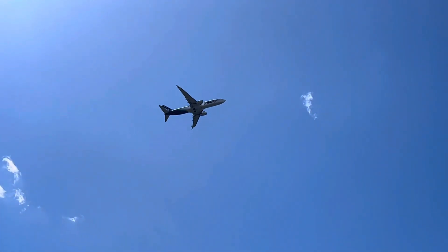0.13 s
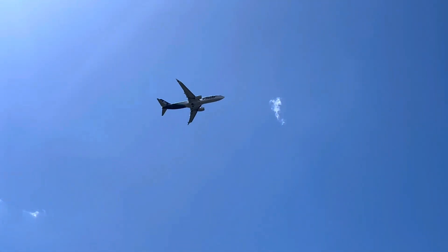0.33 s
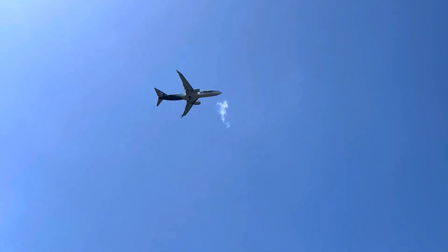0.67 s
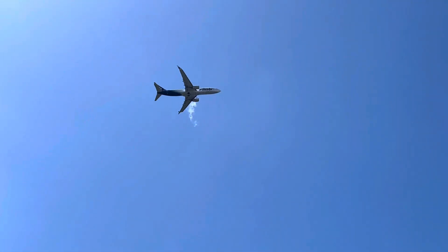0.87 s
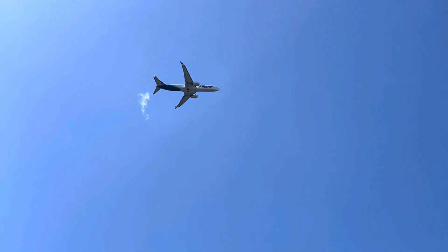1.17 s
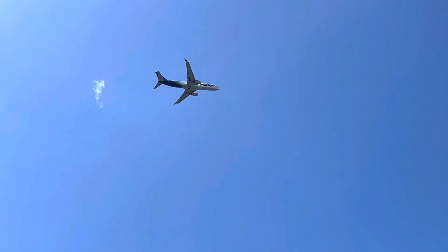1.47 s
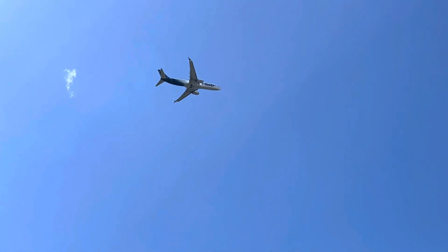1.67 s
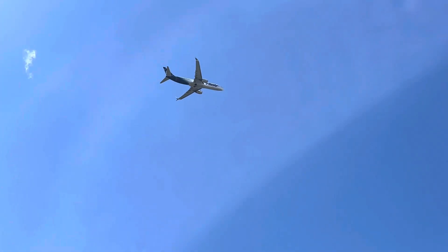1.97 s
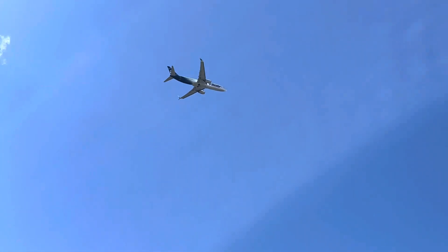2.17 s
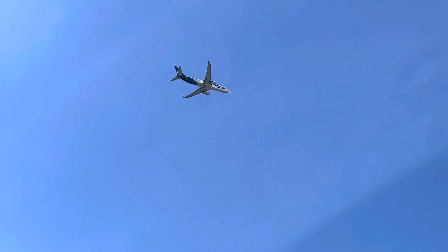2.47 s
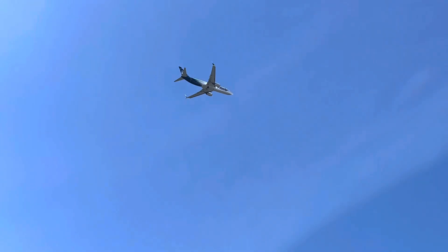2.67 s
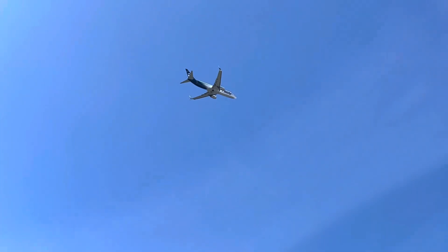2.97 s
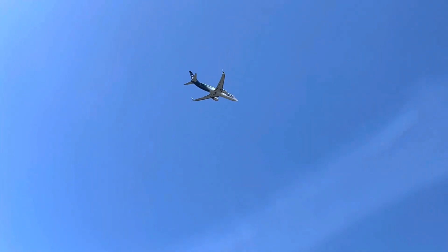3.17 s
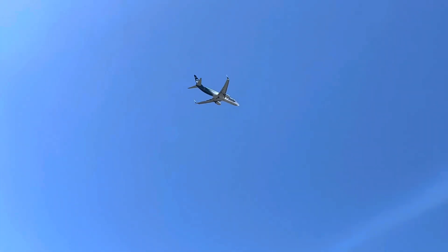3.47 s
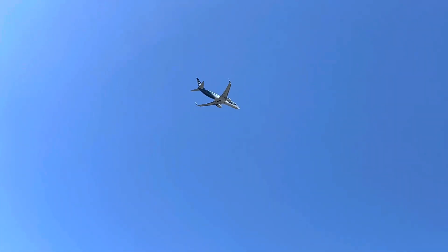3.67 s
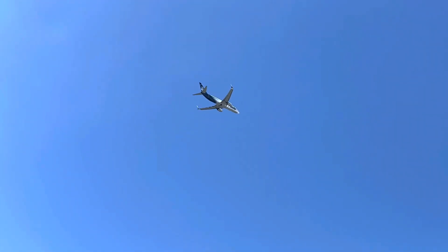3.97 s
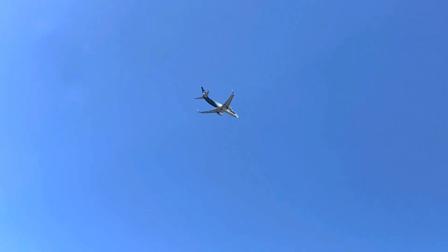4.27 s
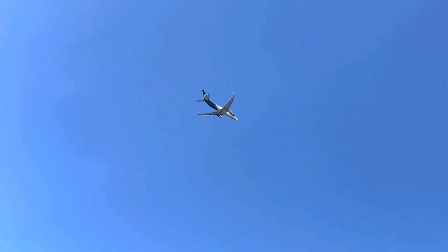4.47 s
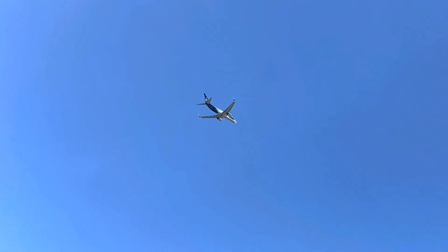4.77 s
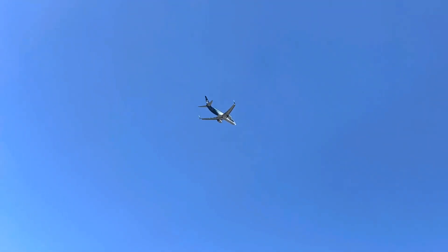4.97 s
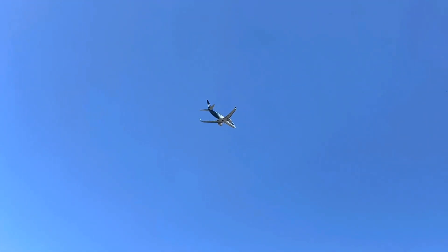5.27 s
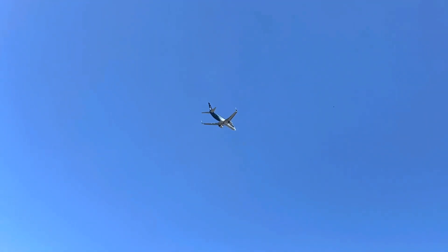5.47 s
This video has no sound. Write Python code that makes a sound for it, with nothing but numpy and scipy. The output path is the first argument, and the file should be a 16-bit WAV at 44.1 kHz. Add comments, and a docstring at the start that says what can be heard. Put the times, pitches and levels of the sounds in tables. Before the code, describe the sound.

Outdoors under a clear sky, one departing passenger jet dominates. Continuous deep rumble and rushing midrange noise start at full strength, with ragged crackling flutter in the treble. A weak whine hides inside the roar, falling gradually as the plane flies off. The level eases only slightly by the end. Captured on a small device with two tiny microphones, uneven stereo and muted highs.

```python
"""A broad exhaust roar fills the sky at once: a jet airliner climbing away overhead, over open ground.
Shaped noise makes the roar; turbulent air swells and sags it, more raggedly in the treble.
A faint fan whine of three blurred harmonics falls in pitch as the plane recedes, and a dull, late
copy off the ground combs the bass. Two small microphone ports give the stereo image, each with its
own level, phase and scattered sound; a very faint bass image sits about a high carrier."""
import sys
import numpy as np
from scipy import signal
from scipy.fft import rfft, irfft, next_fast_len
from scipy.io import wavfile

SR = 44100
rng = np.random.default_rng(int(sys.argv[2]) if len(sys.argv) > 2 else 0)


def to_wav(s):
    """Save 16-bit WAV."""
    ch = np.atleast_2d(s).T  # columns
    pcm = np.round(np.clip(ch, -1, 1) * 32767)  # PCM
    wavfile.write(sys.argv[1], SR, pcm.astype(np.int16))


def volts_from_decibels(level):
    """Turn decibel levels (scalar or array-like) into linear amplitude factors."""
    exponent = np.asarray(level, float) / 20
    return 10 ** exponent


N = 247401  # length [samples]

# Exhaust colour before the moving levels: (frequency [Hz], relative level per Hz [dB])
EXHAUST_SPECTRUM = [(15, -49), (32, -22), (58, 0.5), (100, -1), (125, -.5), (155, 0.5), (200, -5),
                    (310, -6), (560, -11.5), (800, -15.5), (1020, -20.5), (1300, -18), (1450, -19),
                    (1600, -21.5), (1780, -21.5), (2100, -26.5), (2500, -29.5), (3300, -34), (4100, -42.5),
                    (5100, -50), (6300, -60.5), (7500, -77.5)]
# Swell of the upper roar as eddies focus and scatter it: (time [s], relative level [dB])
UPPER_SWELL = [(0, 10.5), (.1, 3), (.2, 6.5), (.34, -2.5), (.53, 1.5), (.67, -5), (.86, 2.5), (.96, 5),
               (1.12, 5), (1.22, -0.5), (1.29, 5), (1.36, 0.5), (1.48, 5), (1.58, 1), (1.88, 3),
               (2.02, -2.5), (2.15, 4), (2.31, 5.5), (2.39, 4.5), (2.47, 4.5), (2.66, -2), (2.81, -4.5),
               (2.91, 1.5), (3.0, -4.5), (3.25, 3), (3.39, -3.5), (3.51, 1), (3.69, -5), (3.86, 6),
               (4.0, -4.5), (4.12, 5.5), (4.22, -4.5), (4.3, -4.5), (4.44, -4), (4.59, 4), (4.7, -4),
               (4.9, 6.5), (5.03, -2.5), (5.19, -0.3), (5.3, -2), (5.48, -10), (5.61, -1)]
# Treble of the roar: (time [s], relative level [dB])
TREBLE_LEVEL = [(0.0, -38.5), (0.12, -41), (0.14, -34), (0.23, -38), (0.3, -44.5), (0.55, -37.5),
                (0.64, -45.5), (0.83, -35), (0.84, -31), (0.94, -40.5), (1.11, -34), (1.23, -38.5),
                (1.31, -35.5), (1.34, -41.5), (1.5, -38), (1.64, -45), (1.67, -38), (1.78, -43.5),
                (1.87, -37.5), (2.02, -44.5), (2.16, -39), (2.22, -40.5), (2.34, -32.5), (2.4, -39),
                (2.48, -33.5), (2.53, -42.5), (2.86, -46.5), (2.89, -41), (3.44, -41.5), (3.47, -39),
                (3.69, -46.5), (3.77, -41.5), (3.86, -33), (3.94, -41), (4.03, -44.5), (4.11, -35.5),
                (4.23, -46.5), (4.58, -39.5), (4.69, -45.5), (4.91, -34.5), (5.0, -44.5), (5.06, -38.5),
                (5.52, -48.5), (5.61, -39.5)]
# Low roar: (time [s], relative level [dB])
LOW_ROAR_LEVEL = [(0.0, -23), (0.25, -24), (0.45, -21), (0.7, -24.5), (1.03, -17.5), (1.2, -21),
                  (1.79, -25.5), (2.11, -22), (2.44, -18), (2.67, -27.5), (3.05, -20), (3.35, -25),
                  (3.56, -23), (4.36, -26.5), (4.69, -24), (4.97, -17.5), (5.18, -24.5), (5.6, -29.5)]
# Rumble under the roar: (time [s], relative level [dB])
RUMBLE_LEVEL = [(0.0, -22), (0.64, -20.5), (1.53, -22.5), (2.4, -22), (3.39, -23.5), (4.26, -22),
                (4.63, -23.5), (5.6, -22.5)]
# Topmost hiss: (time [s], relative level [dB])
HISS_LEVEL = [(0.0, -51.5), (0.09, -57.5), (0.19, -53.5), (0.31, -60.5), (0.47, -52), (0.72, -60),
              (0.86, -49.5), (0.9, -54), (1.56, -57.5), (2.06, -54), (2.09, -48.5), (2.11, -55),
              (2.17, -51.5), (2.45, -53.5), (2.76, -61), (2.92, -53), (2.98, -58), (3.05, -53),
              (3.14, -62.5), (3.19, -56.5), (3.34, -58), (3.51, -52.5), (3.66, -61), (3.81, -58),
              (3.88, -49), (3.92, -58), (3.97, -59.5), (4.12, -52), (4.16, -58.5), (4.23, -63.5),
              (4.47, -60), (4.5, -54.5), (4.67, -60), (4.87, -54), (5.52, -66.5), (5.61, -56.5)]
# How each pitch of the roar moves: (frequency [Hz], share of swell [ratio], share of low roar [ratio],
# share of rumble [ratio], share of eddy flicker [ratio], gain seen from astern [dB],
# share of treble [ratio], share of topmost hiss [ratio])
BAND_FOLLOW = [(45, 0.01, 0.01, 1.8, 0.01, -4, 0, 0), (90, 0.01, 0.01, 1.8, 0.01, 1, 0.076, 0),
               (179, 0.054, 0.085, 0.65, .05, 0.5, 0, 0), (258, 0.046, 0.71, 0.23, 0.18, 2, 0.18, 0),
               (387, 0.032, .9, .05, 0.17, -1, 0, 0.017), (724, 0.52, 0.7, 0.01, 0.68, -0.8, 0, 0.23),
               (1030, 0.82, 0.22, .01, 0.37, -2, 0, 0), (1440, 1.0, .05, 0.01, 0.96, 0.5, 0, 0),
               (1900, 0.71, .01, 0.01, .8, 1, 0.83, 0.19), (2050, 0.37, .01, .01, 0.73, -3, 0.62, 0),
               (2900, 0.046, .01, 0.01, 0.48, 1.5, 0.94, 0.15), (4100, .05, .01, .01, 0.3, -1, 0.45, .55),
               (5800, .05, .01, 0.01, 0.3, 0.3, 0.15, 0.8)]
# Blade rate as heard, falling as the plane recedes: (time [s], frequency [Hz])
BLADE_RATE = [(0, 1975), (.15, 1960), (1.1, 1880), (1.65, 1813), (2.2, 1748), (2.6, 1724), (3.0, 1686),
              (3.45, 1648), (4.1, 1617), (4.55, 1592), (4.85, 1571), (5.3, 1568), (5.61, 1561)]
# Fan whine before waver and swell, overtones beamed rearward:
# (time [s], 1st harmonic [dB], 2nd harmonic [dB], 3rd harmonic [dB])
FAN_LEVELS = [(0, -50, -66, -84), (.15, -40, -67, -84), (.35, -48, -68, -84), (1.1, -41, -66, -82),
              (1.45, -44, -66, -80), (1.65, -39, -55, -78), (2.0, -41, -58, -76), (2.2, -41, -52, -74),
              (2.7, -47, -60, -76), (2.95, -47, -54, -74), (3.3, -47, -57, -72), (3.5, -47, -51, -70),
              (3.65, -50, -62, -72), (4.35, -50, -59, -70), (4.5, -50, -50, -62), (4.68, -50, -58, -65),
              (4.85, -50, -48, -63), (5.2, -47, -49.5, -63), (5.4, -46, -51, -73), (5.5, -48, -50.5, -68),
              (5.61, -48, -50, -58)]
# Extra path by way of the ground, longest under the plane: (time [s], lag [ms])
GROUND_DELAY = [(0, 6.05), (.8, 6.4), (2.0, 7.15), (2.8, 7.3), (3.5, 7.1), (4.3, 6.65), (5.61, 6.4)]
# The two ports: (frequency [Hz], left over right [dB], left lead [rad], share common to both [0-1])
PORT_BALANCE = [(30, 0.1, 0.01, .97), (150, -1.2, .1, .96), (480, 0.1, .25, .85), (700, -1.5, .95, .85),
                (900, 4.1, 1.2, .75), (1010, 3.5, .8, .3), (1060, 1.1, .1, .5), (1200, -2, .5, .65),
                (1300, -3.5, .9, .7), (1400, -5, 1.45, .75), (1500, -6.5, 2.1, .8), (1590, -7, 2.5, .8),
                (1645, -7, 2.5, .8), (1670, -8, -.15, .86), (1800, -8, -.1, .88), (2050, -5.5, .01, .9),
                (2500, -2.5, .24, .95), (3000, -1, .28, .95), (3400, -.3, .2, .96), (3900, 0, .03, .997),
                (4800, 0, 0, 1), (5150, 0, 0, 1), (5220, 0, -.4, .97), (5750, 0, -1.05, .9),
                (6300, 0, -.9, .86), (7400, 0, -1.5, .6)]
# Balance added as the direction swings: (frequency [Hz], left over right [dB], left lead [rad])
BALANCE_SHIFT = [(600, 0, 0), (900, -3, .2), (1000, -4, .9), (1100, -.5, .4), (1300, .1, .45),
                 (1500, -1.8, .05), (1640, -1.5, -.15), (1800, -2.5, -.1), (2600, 0, 0)]
# How much of that shift applies: (time [s], amount [-1 to 1])
DIRECTION_SWING = [(0, -0.42), (1.05, 0.019), (1.75, 0.95), (2.45, 0.92), (3.15, 0.15), (3.85, -0.28),
                   (4.5, -1), (5.61, -0.49)]


def exhaust(shared_db, own_db):
    """Three unrelated jet-noise roars with the same swells: one common to both ports, one scattered to each."""
    roar_db = -17  # overall rms level
    eddy_hz, rasp_hz, own_hz = 14, 90, 13.2  # corner rates of the flickers
    rasp_db, rasp_follows_swell = 1.3, 0.6  # ragged flicker at mid-swell, deeper in the swells
    size = next_fast_len(N)
    hz = np.arange(size // 2 + 1) * SR / size
    colour_db, = at_hz(EXHAUST_SPECTRUM, hz)
    noise = rfft(rng.standard_normal((3, size))) * volts_from_decibels(colour_db)

    swell_db = swing(UPPER_SWELL)
    eddies = shared_db * drift(eddy_hz)
    rasp = rasp_db * volts_from_decibels(rasp_follows_swell * swell_db) * drift(rasp_hz)
    # same order as the columns of BAND_FOLLOW
    controls = np.array([swell_db, swing(LOW_ROAR_LEVEL), swing(RUMBLE_LEVEL), eddies + rasp,
                         astern(), swing(TREBLE_LEVEL), swing(HISS_LEVEL)])

    roars = np.zeros((3, N))
    for centre_hz in 32 * 2 ** np.arange(0, 8.6, 0.5):
        octaves = np.log2((hz + 1e-9) / centre_hz)
        # bands half an octave apart, overlapping so that they sum to one
        band = np.where(abs(octaves) < 0.5, np.cos(np.pi * octaves) ** 2, 0)
        shares = np.array(at_hz(BAND_FOLLOW, centre_hz))
        level_db = shares @ controls + own_db * drift(own_hz)
        roars += volts_from_decibels(level_db) * irfft(noise * band, size)[:, :N]
    return volts_from_decibels(roar_db) * rms_one(roars)


def astern():
    """Share of the plane's speed that points away from the listener on a straight pass, -1 to 1."""
    speed_m_per_s, closest_m, closest_s = 90, 400, 1.5
    along_m = speed_m_per_s * (np.arange(N) / SR - closest_s)
    return along_m / np.hypot(along_m, closest_m)


def fan(waver_db):
    """Three harmonics of the blade rate: a steady core plus a share blurred into a narrow noise band."""
    blur_hz, blurred_share = (20, 12, 45), (0.65, 0.3, 0.9)  # for each harmonic
    waver_hz, follows_swell = 5.0, 0.25
    blade_hz, = in_time(BLADE_RATE)
    phase = 2 * np.pi * np.cumsum(blade_hz) / SR
    whine = np.zeros(N)
    for k, level_db in enumerate(in_time(FAN_LEVELS)):
        # turbulence scrambles level and phase
        blur = drift(blur_hz[k]) + 1j * drift(blur_hz[k])
        steady = np.sqrt(2 * (1 - blurred_share[k]))
        carrier = steady + np.sqrt(blurred_share[k]) * blur
        tone = np.real(carrier * np.exp(1j * (k + 1) * phase))
        whine += volts_from_decibels(level_db + waver_db * drift(waver_hz)) * tone
    return volts_from_decibels(follows_swell * swing(UPPER_SWELL)) * whine


def ground(direct):
    """The ground's longer path gives a later copy, dulled by a one-pole lowpass."""
    echo_db, cut_hz = -7.5, 1530
    lag_ms, = in_time(GROUND_DELAY)
    samples = np.arange(N)
    late = np.interp(samples - lag_ms * SR / 1000, samples, direct)
    keep = np.exp(-2 * np.pi * cut_hz / SR)
    return volts_from_decibels(echo_db) * signal.lfilter([1 - keep], [1, -keep], late)


def ports(common, scattered, shift):
    """Each port hears the common wave with its own level and phase, plus its own scattered share."""
    dip_hz, dip_shift_hz, dip_width_hz, dip_db = 1640, 20, 35, -1.5
    top_hz = 7600  # nothing passes above
    size = next_fast_len(N + 4096)
    hz = np.arange(size // 2 + 1) * SR / size
    over_db, lead, share = at_hz(PORT_BALANCE, hz)
    added_db, added_lead = at_hz(BALANCE_SHIFT, hz)
    over_db = over_db + shift * added_db
    lead = lead + shift * added_lead
    share = np.clip(share, 0, 1)

    side = np.array([[0.5], [-0.5]])  # left, right
    shared_wave = np.sqrt(share) * rfft(common, size) * np.exp(1j * side * lead)
    own_wave = np.sqrt(1 - share) * rfft(scattered, size)
    # a narrow dip on the right where the phase jumps
    offset = (hz - dip_hz - dip_shift_hz * shift) / dip_width_hz
    right_db = dip_db * np.exp(-offset ** 2)
    gain = volts_from_decibels(side * over_db + [[0], [1]] * right_db)
    return irfft((shared_wave + own_wave) * gain * (hz < top_hz), size)[:, :N]


def bass_image(dry):
    """Multiplying the bass by a high carrier mirrors it faintly above and below the carrier."""
    image_db, bass_cut_hz, carrier_hz = -68, 370, 9600
    lowpass = signal.butter(6, bass_cut_hz, fs=SR, output="sos")
    bass = signal.sosfilt(lowpass, dry.mean(axis=0))
    return volts_from_decibels(image_db) * bass * 2 * np.cos(2 * np.pi * carrier_hz * np.arange(N) / SR)


def rms_one(x):
    """Scale to unit rms."""
    return x / np.sqrt(np.mean(x ** 2) + 1e-20)


def in_time(rows):
    """Each column as a straight-line curve per sample."""
    s, *columns = np.transpose(rows)
    return [np.interp(np.arange(N) / SR, s, c) for c in columns]


def at_hz(points, hz):
    """Each column read on a log-frequency axis."""
    f, *columns = np.transpose(points)
    return [np.interp(np.log(hz + 1e-9), np.log(f), c) for c in columns]


def swing(rows):
    """A level curve about its mean, in dB."""
    level_db, = in_time(rows)
    return level_db - level_db.mean()


def drift(rate_hz):
    """Random wander of unit rms: noise at every 40th sample through a double one-pole at rate_hz."""
    step = 40
    r = np.exp(-2 * np.pi * rate_hz * step / SR)
    noise = rng.standard_normal(N // step + 2002)
    slow = signal.lfilter([1], [1, -2 * r, r * r], noise)[2000:]  # skip the filter's start-up
    return np.interp(np.arange(N) / step, np.arange(len(slow)), rms_one(slow))


def scene():
    """Roar and whine reach the ports directly and off the ground, as their direction swings."""
    common, *scattered = exhaust(shared_db=1.1, own_db=0.82)
    direct = common + fan(waver_db=0.6)
    heard = direct + ground(direct)
    direction, = in_time(DIRECTION_SWING)
    blend = np.clip((1 + direction) / 2, 0, 1)
    # crossfade between the two extremes of direction
    return blend * ports(heard, scattered, 1) + (1 - blend) * ports(heard, scattered, -1)


def low_pass(x):
    """Removes everything above the highest recorded frequency."""
    return signal.sosfilt(signal.butter(12, 10300, fs=SR, output="sos"), x)


def record(dry):
    """The finished mix: the scene with its faint bass image added to both channels."""
    mix = dry + bass_image(dry)
    return low_pass(mix)


dry = scene()
out = record(dry)
to_wav(out)
```